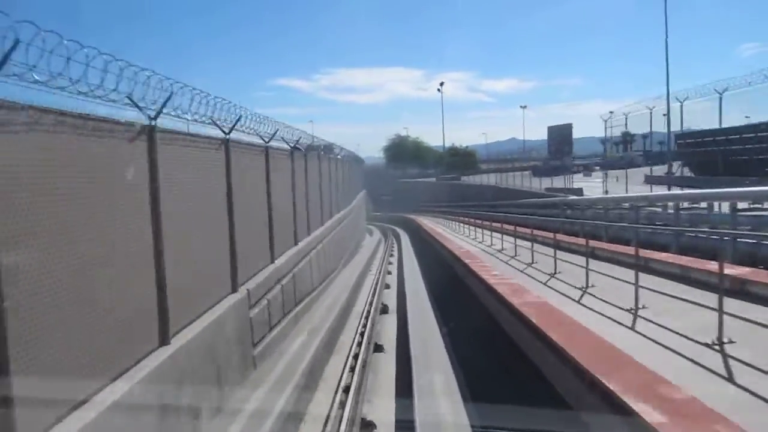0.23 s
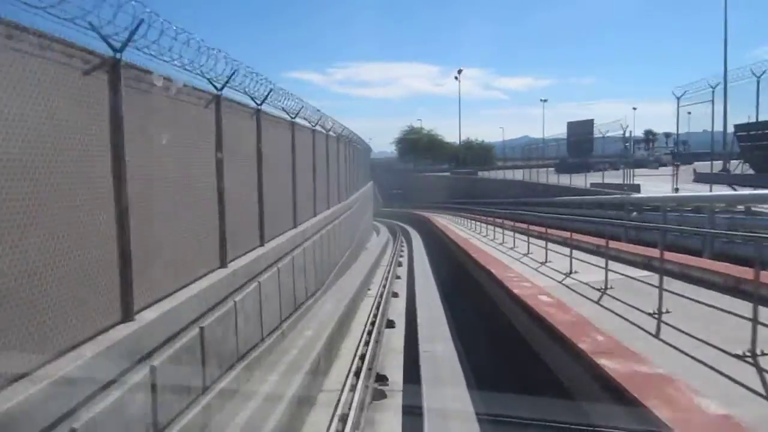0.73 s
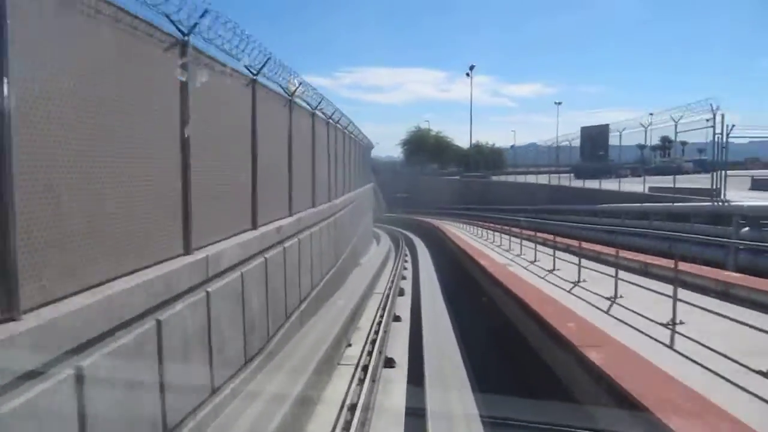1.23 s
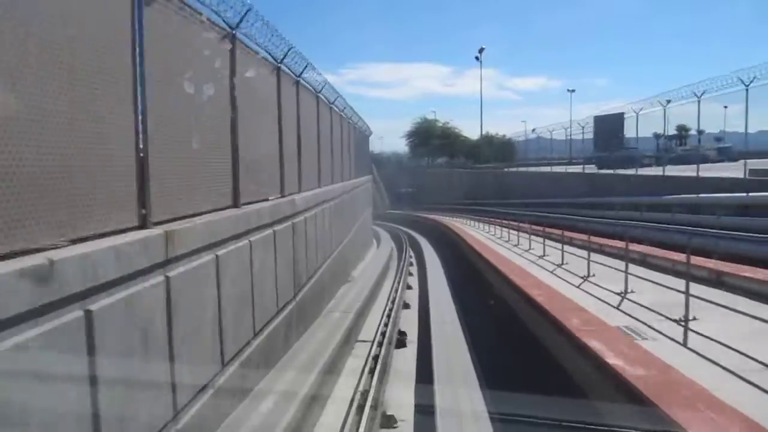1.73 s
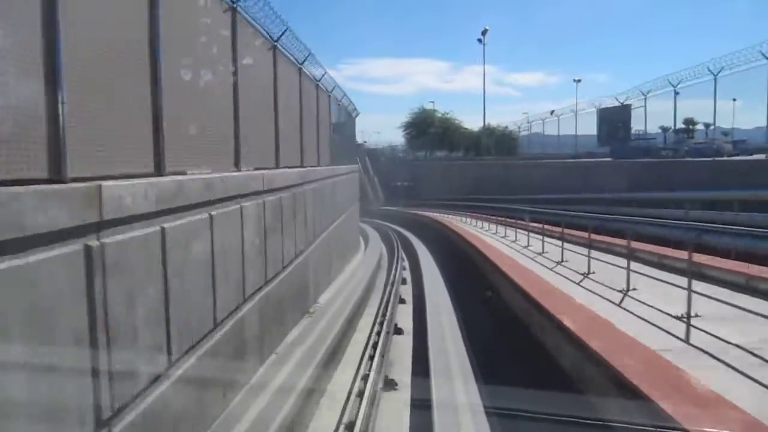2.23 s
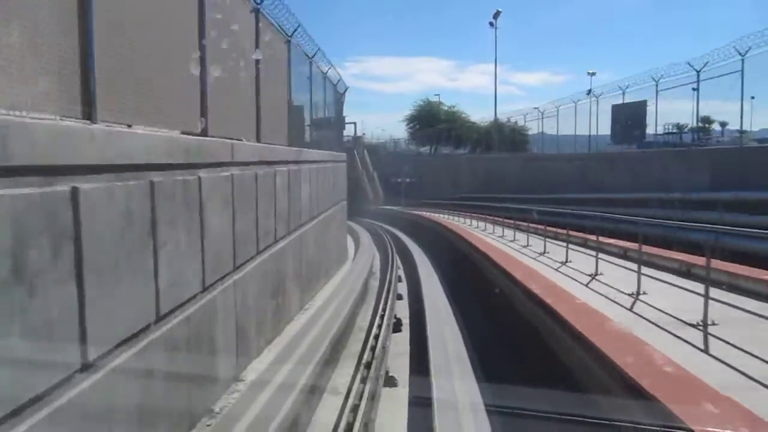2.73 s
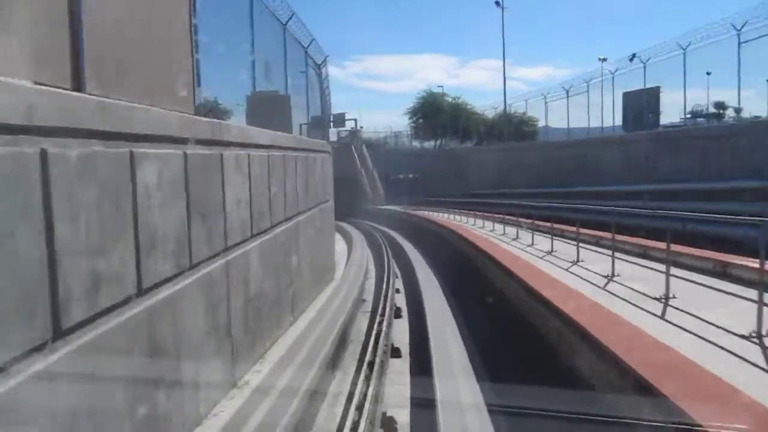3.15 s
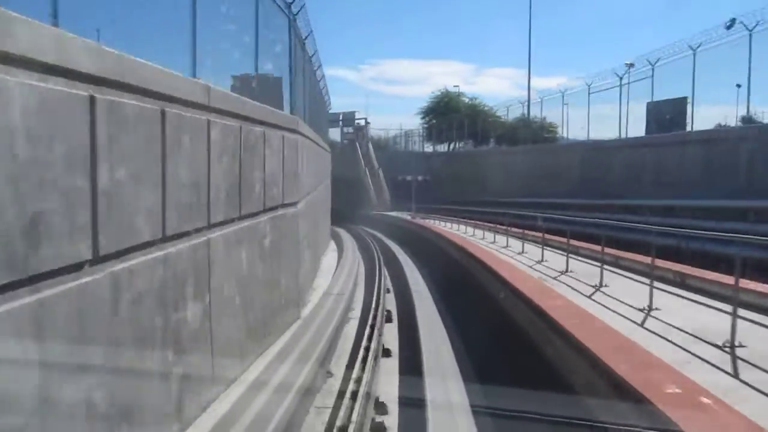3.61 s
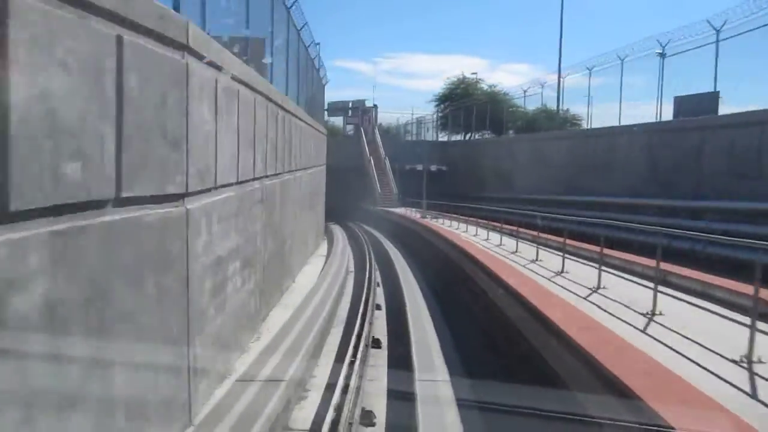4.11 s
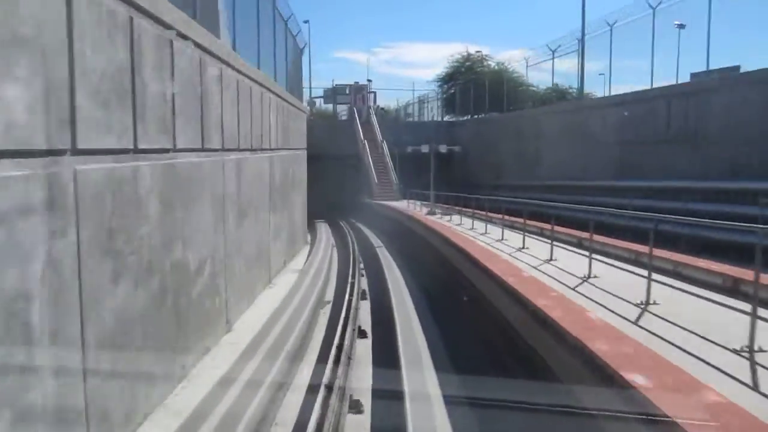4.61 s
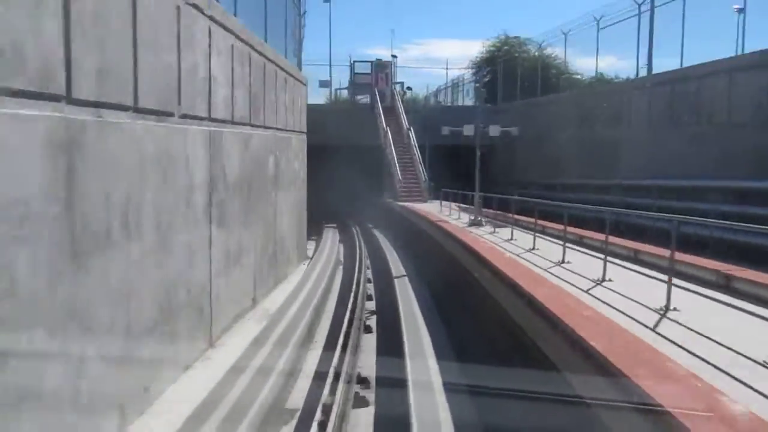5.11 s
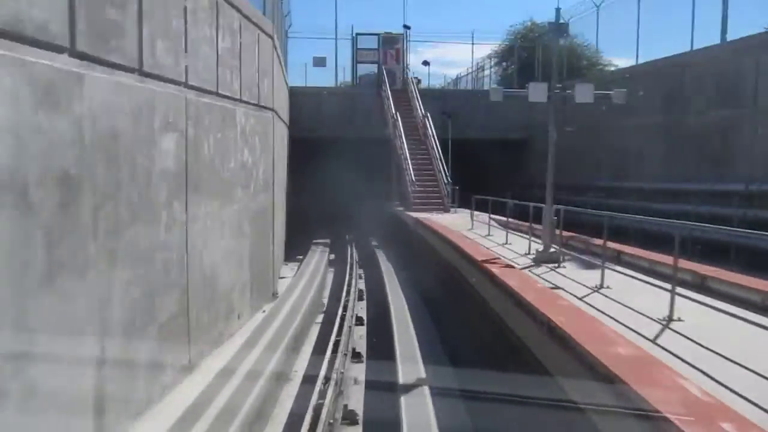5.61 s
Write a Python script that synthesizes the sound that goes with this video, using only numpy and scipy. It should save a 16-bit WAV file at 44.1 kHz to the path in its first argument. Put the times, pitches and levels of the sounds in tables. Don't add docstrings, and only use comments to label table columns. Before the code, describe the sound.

Continuous cabin noise of a rubber-tyred tram, bass-heavy and nearly unchanged throughout. Floor shake swells and dips irregularly, panels ring within the roar, and air rushes lightly. The gear whine starts weak and broken, then strengthens and flutters. A brief valve hiss and small squeaks occur around three seconds, then a click after four. Close small stereo microphones, wide in the treble, centred in the bass.

```python
import sys
import numpy as np
from scipy import signal
from scipy.fft import rfft, irfft
from scipy.io import wavfile
from scipy.ndimage import uniform_filter1d

SR = 44100
rng = np.random.default_rng(int(sys.argv[2]) if len(sys.argv) > 2 else 0)


def to_linear_factor(level_db):
    exponent = np.asarray(level_db, float) / 20
    return 10 ** exponent


def wav_out(sig):
    wavfile.write(sys.argv[1], SR, np.round(np.clip(np.atleast_2d(sig).T, -1, 1) * 32767).astype(np.int16))


N = 258426

# (time [s], level [dB])
AIR_RUSH = [(0, 1), (.22, 1.5), (.5, -0.5), (.75, -0.2), (.9, 1.5), (1.02, -1), (1.45, 0.1), (1.68, 1),
            (1.8, 0), (2.05, 0.5), (2.65, -0.5), (3.3, -1), (4.12, 0.5), (4.32, 1.5), (4.5, 0), (4.9, .5),
            (4.99, -3), (5.86, -1)]
# (time [s], level [dB])
GEAR_LOAD = [(0, -30.5), (.5, -29), (1.3, -29), (1.75, -25), (2.08, -20), (2.4, -23), (3.0, -22),
             (3.25, -24), (3.4, -24), (3.62, -24.5), (3.8, -29), (4.1, -24.5), (4.55, -25), (4.8, -23.5),
             (4.97, -21), (5.25, -23), (5.6, -23), (5.86, -23.5)]
TONE_REST = {"second": (-44.5, 1.56), "hum": (-37, 1.23), "axle": (-39.5, 1.6), "fan": (-42, 2.1)}
# (frequency [Hz], phase [rad])
PORT_LAG = [(100, 0), (2240, 0.25), (3800, 1.57), (5000, 2.5), (15000, 2)]


def evened(x):
    return x / np.sqrt(np.mean(abs(x) ** 2) + 1e-20)


def read(points, hz):
    f, value = np.transpose(points)
    return np.interp(np.log(hz + 1), np.log(f + 1), value)


def curve(rows, t):
    s, level = np.transpose(rows)
    return np.interp(t, s, level)


def load_swing():
    load_db = curve(GEAR_LOAD, np.arange(N) / SR)
    return load_db - load_db.mean()


def wander(per_s):
    z = rfft(rng.standard_normal(N))
    smoothing = 1 + (np.fft.rfftfreq(N, 1 / SR) / per_s) ** 4
    return evened(irfft(z / smoothing, N))


def bump(t, s, length):
    return np.exp(-.5 * ((t - s) / (length / 3)) ** 2)


def swells(rows, t):
    return sum(db * bump(t, s, length) for s, length, db in rows)


def ports(one, hz):
    # (frequency [Hz], likeness [1])
    likeness = [(20, .985), (60, .994), (120, .995), (240, 0.94), (480, 0.99), (950, .89), (1890, 0.56),
                (3770, 0.27), (7520, .2), (15000, 0.3)]
    # (frequency [Hz], level [dB])
    tilt = [(60, 0.58), (180, -0.82), (550, -0.62), (1650, -0.91), (4970, -0.39), (15000, 1.0)]
    same = np.clip(read(likeness, hz), -1, 1)[:, None]
    right = same * one[0] + np.sqrt(1 - same ** 2) * one[1]
    right = right * np.exp(-1j * read(PORT_LAG, hz))[:, None]
    half = to_linear_factor(read(tilt, hz) / 2)[:, None]
    return np.array([one[0] * half, right / half])


def noise(shape, size, patchy_db, flicker_db):
    hop = size // 4
    frames, hz = N // hop + 5, np.fft.rfftfreq(size, 1 / SR)
    a, b, c, d, patches = rng.standard_normal((frames, len(hz), 5)).T
    patches = uniform_filter1d(patches, size=12, axis=0)
    patches = evened(uniform_filter1d(patches, size=8, axis=1))
    flicker = rng.standard_normal(frames)
    colour_db = shape(hz)[:, None] + patchy_db * patches + flicker_db * flicker
    z = ports(np.array([a + 1j * b, c + 1j * d]), hz) * to_linear_factor(colour_db)
    out = signal.istft(z, nperseg=size, noverlap=size - hop)[1][:, :N]
    return out / np.sqrt(np.mean(out.mean(0) ** 2))


def closed(points):
    return lambda hz: np.where((hz < points[0][0]) | (hz > points[-1][0]), -120, read(points, hz))


def ringing(modes):
    def shape(hz):
        power = sum(to_linear_factor(db) ** 2 / w / (1 + (2 * (hz - f) / w) ** 2) ** 2 for f, w, db in modes)
        return 10 * np.log10(power)
    return shape


def tone(hz, db, waver_hz, flutter_db, lag):
    turn = 2 * np.pi * np.cumsum(hz + waver_hz * wander(5.97)) / SR
    level = np.sqrt(2) * to_linear_factor(db + flutter_db * wander(18.0))
    return level * np.sin(turn - np.array([[lag], [0]]))


def floor():
    # (frequency [Hz], width [Hz], level [dB])
    groups = [
        [(22, 14, 1), (42.5, 24, -4)],
        [(64.9, 19, 0)],
        [(87.3, 22, 1), (99.2, 19, -4.5)],
        [(118.9, 18.4, 0)],
    ]
    rest_levels = [-21, -22, -19.5, -23]
    # (time [s], length [s], lift [dB], shaken pitch [Hz])
    patches = [(0.024, 0.12, 6.5, 55), (0.03, 0.13, -10, 92), (0.12, 0.1, -2.5, 47), (0.15, 0.11, 5.5, 130),
               (0.21, 0.11, 4, 28), (0.538, 0.9, 2, 65.6), (0.66, 0.2, -8, 39), (0.96, 0.12, 5.5, 92),
               (1.075, 0.1, 4.5, 30), (1.24, 0.091, 1.5, 64), (1.35, 0.12, -5.5, 28), (1.44, 0.11, 5, 130),
               (1.68, 0.13, 6, 28), (1.747, 0.14, -5.5, 132), (2.113, 0.13, 3.5, 113),
               (2.49, 0.081, 3.5, 66), (2.76, 0.22, -13, 55), (2.89, 0.14, 3, 78), (3.19, 0.22, -3, 93),
               (3.45, 0.46, 1.5, 38), (3.598, 0.13, -3.5, 92), (3.917, 0.085, 4.5, 111),
               (4.188, 0.29, -3, 130), (4.29, 0.31, 4, 48), (4.62, 0.093, -6.5, 55), (4.857, 0.16, 4, 46.4),
               (4.88, 0.1, 4.5, 130), (5.18, 0.18, -12.5, 66), (5.297, 0.25, -4.5, 131),
               (5.356, 0.1, 3, 90)]
    reach_octaves = .3
    t, out = np.arange(0, N, 64) / SR, np.zeros((2, N))
    s, length, lift_db, hz = np.transpose(patches)
    centres = np.array([np.mean([f for f, w, db in modes]) for modes in groups])
    reach = np.exp(-.5 * (np.log2(centres[:, None] / hz) / reach_octaves) ** 2)
    push_db = (reach / reach.max(0) * lift_db) @ bump(t, s[:, None], length[:, None])
    for modes, rest_db, db in zip(groups, rest_levels, push_db):
        ring = noise(ringing(modes), size=8192, patchy_db=-0.5, flicker_db=-0.2)
        chance = uniform_filter1d(ring.mean(0) ** 2, size=3000)
        chance = uniform_filter1d(chance, size=3000)
        push = to_linear_factor(rest_db + 1.45 * np.interp(np.arange(N) / SR, t, db))
        out += push * ring / np.sqrt(abs(chance) + 0.075)
    return out


def cabin_roar():
    # (frequency [Hz], level [dB per Hz])
    colour = [(120, -31), (200, -4.5), (308, -10), (368, -5), (436, -8), (609, -8), (678, -4), (802, -10),
              (1160, -14), (1390, -11.5), (1550, -17), (2040, -19), (3500, -25), (4550, -36), (7700, -120)]
    rush_db = curve(AIR_RUSH, np.arange(N) / SR)
    level_db = -24.0 + 0.49 * rush_db + .12 * load_swing()
    return to_linear_factor(level_db) * noise(closed(colour), size=2048, patchy_db=0.2, flicker_db=0.8)


def wind():
    # (frequency [Hz], level [dB per Hz])
    colour = [(1500, -18.5), (3000, -5), (4000, -2), (5500, -4.5), (7000, -7), (9000, -10.5), (11000, -16),
              (13000, -25.5), (16000, -37)]
    level_db = -39 + curve(AIR_RUSH, np.arange(N) / SR)
    return to_linear_factor(level_db) * noise(closed(colour), size=512, patchy_db=0.6, flicker_db=0.46)


def panels():
    # (frequency [Hz], width [Hz], level [dB])
    modes = [(236.9, 12.5, -39.5), (264.3, 3.2, -39), (291.5, 13, -39), (384, 34, -41.5), (459, 8.4, -41.5),
             (492, 26, -40), (592, 8.9, -47.5), (686, 26, -40), (720, 9.5, -44), (745.5, 8.4, -42),
             (528, 15, -43.5), (614, 16, -46.5), (801, 11, -48.5), (1058, 8.7, -47), (1110, 17, -59),
             (1247, 10, -58), (1302, 23, -46.5), (1421, 43, -43.5), (1687, 90, -45), (2075, 8, -49),
             (2030, 140, -44.5), (152, 27, -32.5), (183.4, 9, -37)]
    total = np.sqrt(sum(to_linear_factor(db) ** 2 for f, width, db in modes))
    return total * noise(ringing(modes), size=16384, patchy_db=1.0, flicker_db=-0.3)


def gears():
    # (time [s], length [s], dip [dB])
    slack = [(0.12, 0.056, -7), (0.27, 0.12, -8), (0.66, 0.19, -10), (1.03, 0.06, -2.5),
             (1.12, 0.054, -4.5), (1.35, 0.054, -2), (1.83, 0.22, -3.5), (2.25, 0.13, -2.5),
             (3.31, 0.041, -5.5), (3.5, 0.13, -13), (3.72, 0.1, -10), (3.84, 0.06, -4.0), (4.04, 0.048, -5),
             (4.24, 0.18, -5), (4.46, 0.054, -10), (4.72, 0.073, -4.5), (4.84, 0.15, -7),
             (5.09, 0.09, -9.0), (5.41, 0.06, -5), (5.75, 0.14, -9.5)]
    # (time [s], length [s], lift [dB])
    second_swells = [(1.54, 0.15, 5), (1.84, 0.15, 3.5), (2.08, 0.16, 6.5), (2.34, 0.13, 6),
                     (2.65, 0.59, 2), (2.75, 0.18, 4.5), (3.19, 0.13, 2.0), (3.52, 0.7, 4.5),
                     (4.03, 0.18, 3.5), (4.58, 0.61, 6), (5.48, 0.084, 2.5), (5.67, 0.98, 5.5)]
    t, swing_db = np.arange(N) / SR, load_swing()
    mesh_hz = 684 - 1.1 * t
    mesh_db = curve(GEAR_LOAD, t) + 1.6 * swells(slack, t)
    looseness_hz = 1.77 * to_linear_factor(-0.74 * swing_db)
    mesh = tone(mesh_hz, mesh_db, waver_hz=looseness_hz, flutter_db=1.42, lag=0.11)
    rest_db, share = TONE_REST["second"]
    second_db = rest_db + share * swells(second_swells, t) + 0.23 * swing_db
    second = tone(2 * mesh_hz, second_db, waver_hz=2.8, flutter_db=3.0, lag=0.55)
    return mesh + second


def swelling_level(name, rows):
    rest_db, share = TONE_REST[name]
    return rest_db + share * swells(rows, np.arange(N) / SR)


def motor_hum():
    # (time [s], length [s], lift [dB])
    pulls = [(0.17, 0.2, 8.5), (0.9, 0.46, 7), (1.69, 0.5, 6), (2.01, 0.15, 4), (2.31, 0.13, 4),
             (2.83, 0.33, 4.5), (3.81, 0.38, 6.5), (4.82, 0.35, 7), (5.44, 0.4, 8.5), (5.69, 0.15, 0)]
    return tone(356, swelling_level("hum", pulls), waver_hz=2.0, flutter_db=2.6, lag=0.091)


def axle_moan():
    # (time [s], length [s], lift [dB])
    moans = [(0.15, 0.12, 5.5), (0.41, 0.15, 8.0), (1.45, 0.15, 5.5), (1.97, 0.58, 4.5), (2.49, 0.21, 6.5),
             (2.88, 0.22, 3.5), (3.98, 0.25, 5), (4.75, 0.2, 6)]
    return tone(393.6, swelling_level("axle", moans), waver_hz=3.98, flutter_db=-0.7, lag=.1)


def fan_moan():
    # (time [s], length [s], lift [dB])
    moans = [(0.0, 0.75, 3.5), (0.96, 0.33, 4), (1.45, 0.66, 4), (1.83, 0.12, 4.5), (2.57, 0.75, 4),
             (3.32, 0.2, 5), (3.65, 0.15, 4), (5.41, 0.22, 3)]
    return tone(557.3, swelling_level("fan", moans), waver_hz=2.2, flutter_db=2.5, lag=.12)


def blower():
    return tone(3085.1, -54, waver_hz=.4, flutter_db=1.1, lag=.6)


def valves():
    # (start [s], length [s], level [dB])
    leaks = [
        (-.05, .5, -55.5),
        (1.055, .1, -64),
        (2.765, 0.22, -51),
    ]
    # (frequency [Hz], level [dB per Hz])
    colour = [(2500, -30), (4000, -2), (4500, -3), (5500, -10), (9000, -8), (12000, -17), (15800, -18)]
    # (frequency [Hz], width [Hz], level [dB])
    nozzle = [(9490, 64, -1), (10700, 52, -2), (11100, 55, -2), (12200, 150, -4), (13100, 280, -3),
              (13700, 75, -4), (14400, 93, -7)]
    open_s, shut_s, sag_db_per_s = .018, .03, -16
    t, opening = np.arange(N) / SR, np.zeros(N)
    for s, length, db in leaks:
        level = to_linear_factor(db + sag_db_per_s * np.maximum(t - s, 0))
        rise = 1 + np.tanh((t - s) / open_s)
        fall = 1 - np.tanh((t - s - length) / shut_s)
        opening += level * 0.3 * rise * fall
    jet = to_linear_factor(8.5) * noise(closed(colour), size=512, patchy_db=2.2, flicker_db=1.2)
    whistles = to_linear_factor(-3.0) * noise(ringing(nozzle), size=1024, patchy_db=3.0, flicker_db=1.1)
    return opening * (jet + whistles)


def trim_squeaks():
    # (time [s], pitch [Hz], length [s], level [dB])
    squeaks = [(.215, 9750, .04, -52), (3.005, 8550, .04, -45), (2.82, 4350, .07, -46),
               (2.86, 2370, .08, -44), (2.88, 4250, .08, -46), (3.045, 2780, .11, -40),
               (3.065, 13400, .02, -63), (3.44, 9780, .03, -46), (3.48, 9780, .06, -54),
               (4.24, 7200, .035, -43), (4.325, 10200, .015, -53)]
    t, out = np.arange(N) / SR, np.zeros((2, N))
    for s, hz, length, db in squeaks:
        rough_hz = hz * (1 + .008 * wander(150.0))
        turn = 2 * np.pi * np.cumsum(rough_hz) / SR
        lag = np.array([[0], [read(PORT_LAG, hz) / 2]])
        out += np.sqrt(2) * to_linear_factor(db) * bump(t, s, length) * np.sin(turn - lag)
    return out


def clip_ticks():
    # (time [s], peak level [dB])
    ticks = [
        (4.2942, -20.5),
        (4.72, -33),
        (4.93, -34),
    ]
    t, out = np.arange(N) / SR, np.zeros((2, N))
    plastic = signal.butter(2, [3000, 8500], "band", fs=SR)
    for s, db in ticks:
        burst = np.exp(-((t - s) / .0014) ** 4)
        scrape = burst * (.8 * rng.standard_normal(N) + .7 * rng.standard_normal((2, N)))
        out += to_linear_factor(db) * signal.lfilter(*plastic, scrape)
    return out


def scene():
    ride = floor() + cabin_roar() + wind() + panels()
    machinery = gears() + motor_hum() + axle_moan() + fan_moan() + blower()
    return ride + machinery + valves() + trim_squeaks() + clip_ticks()


def band_limit(x):
    return signal.sosfilt(signal.butter(12, 15620, fs=SR, output="sos"), x)


def record(dry):
    notch_hz, notch_width_hz, low_cut_hz = 8215, 4500, 16
    hz = np.fft.rfftfreq(N, 1 / SR)
    off = (hz - notch_hz) / (notch_width_hz / 2)
    notch = off / np.sqrt(1 + off ** 2)
    low_cut = hz ** 2 / np.sqrt(hz ** 4 + low_cut_hz ** 4)
    heard = irfft(rfft(dry, axis=1) * low_cut * notch, N, axis=1)
    return band_limit(heard)


dry = scene()
out = record(dry)
wav_out(out)
```